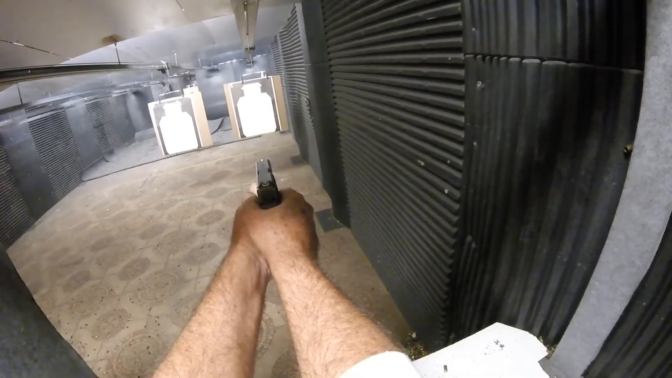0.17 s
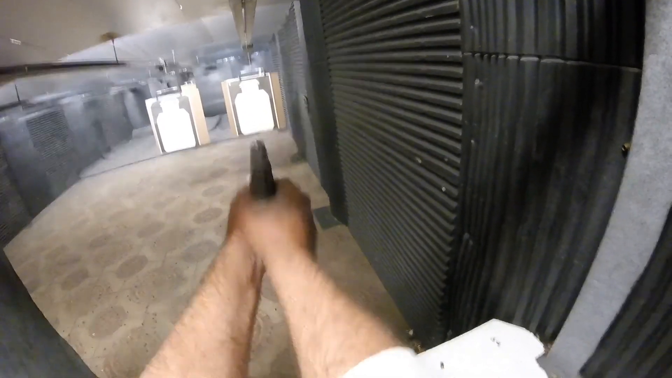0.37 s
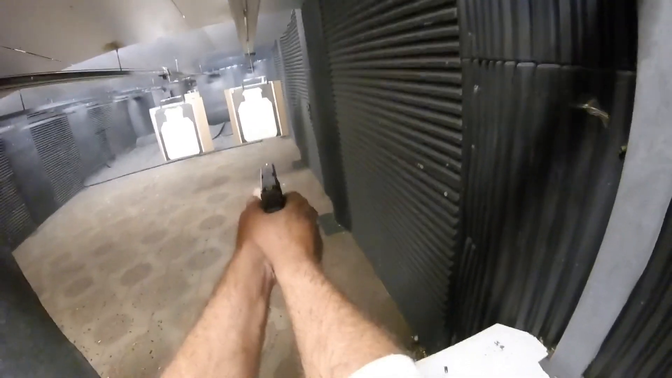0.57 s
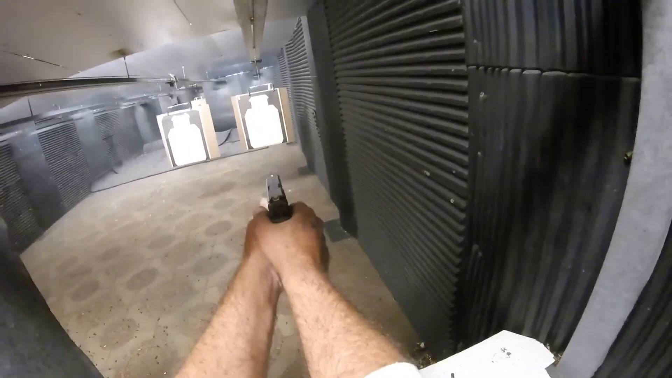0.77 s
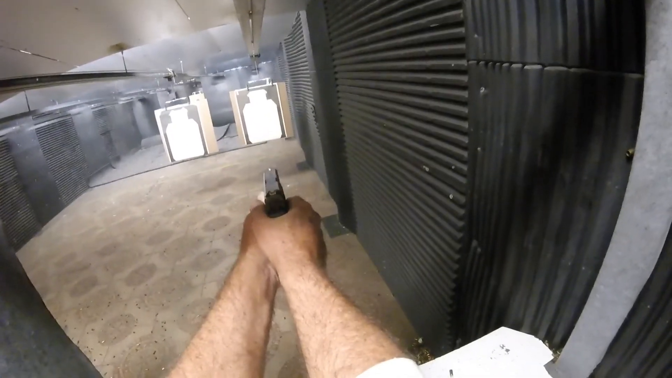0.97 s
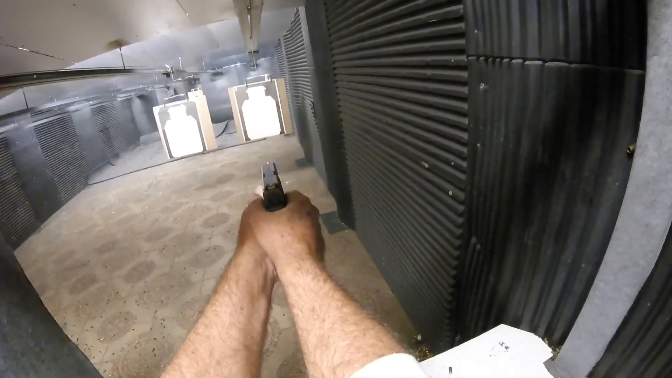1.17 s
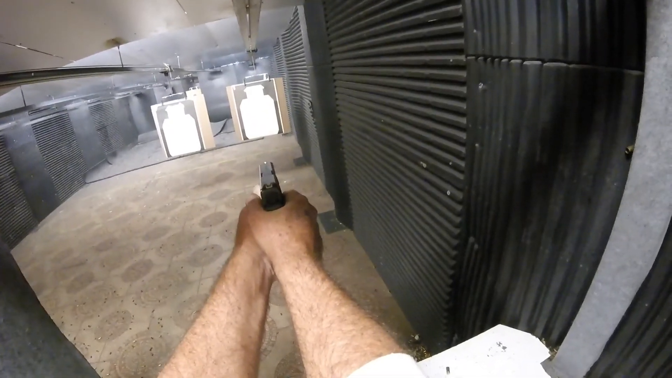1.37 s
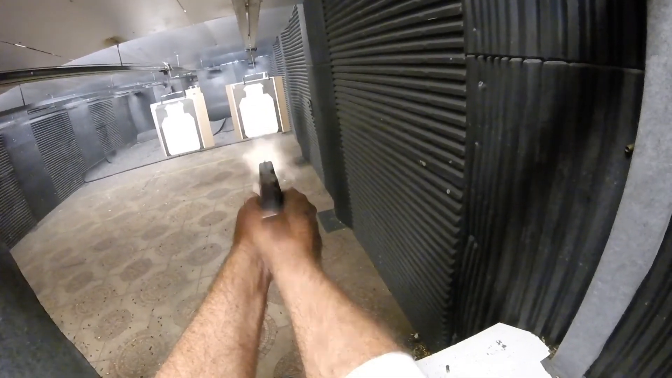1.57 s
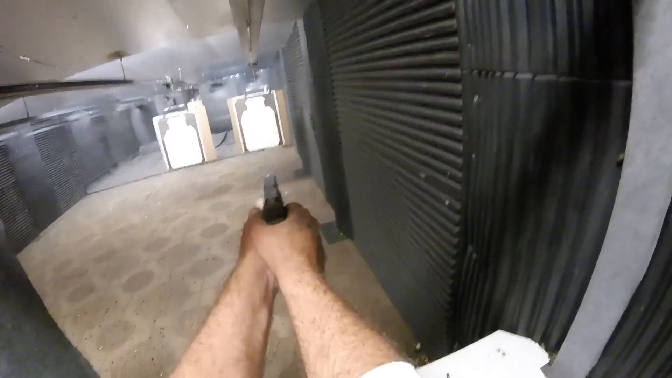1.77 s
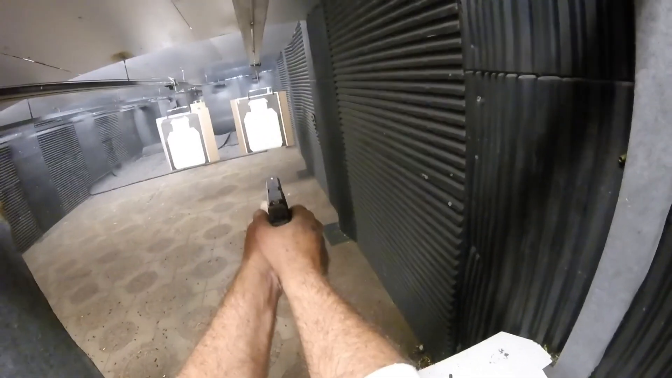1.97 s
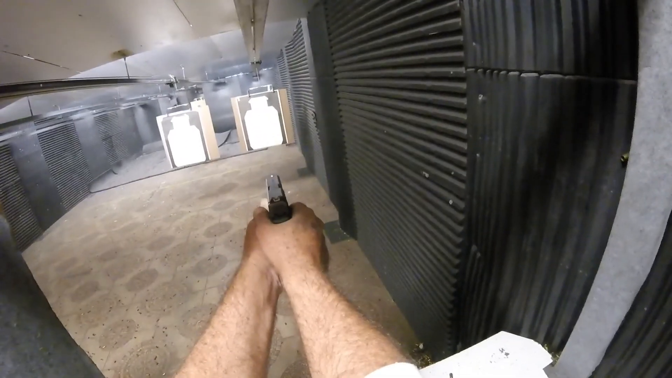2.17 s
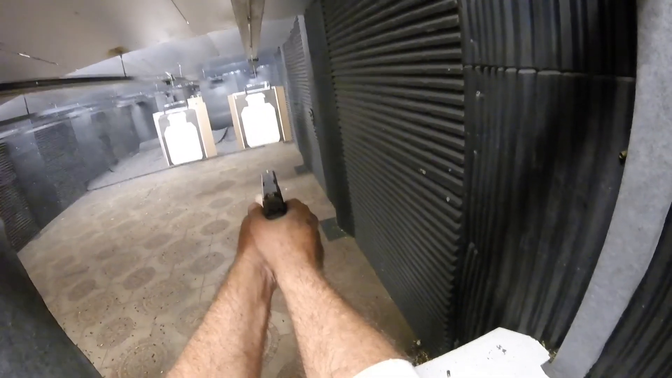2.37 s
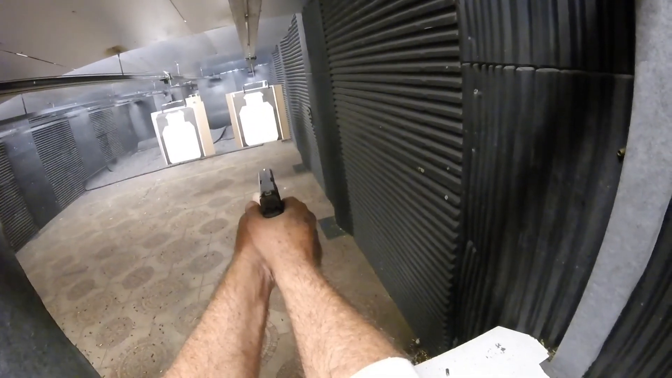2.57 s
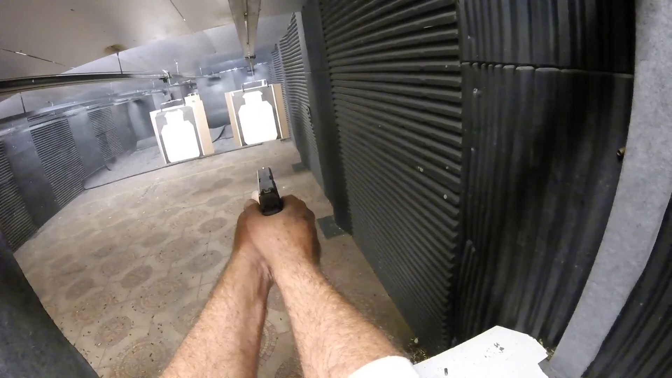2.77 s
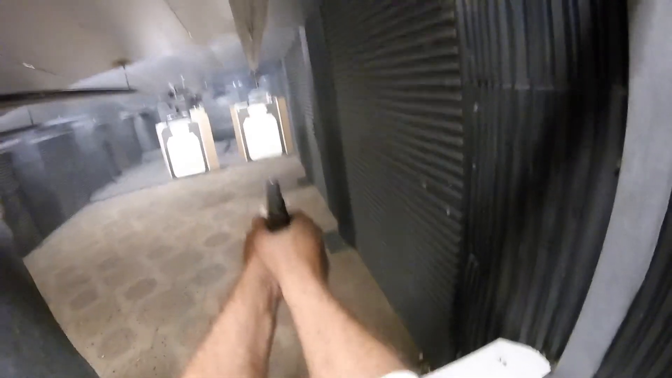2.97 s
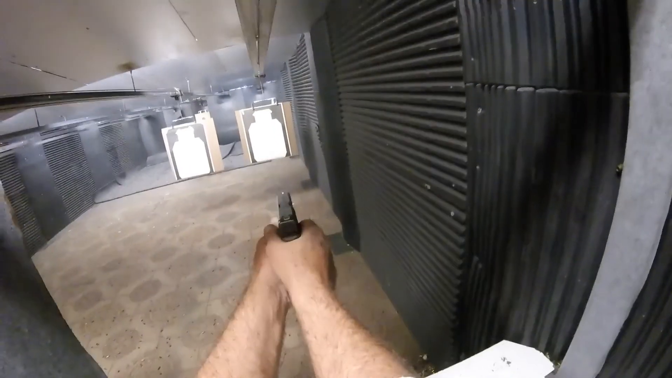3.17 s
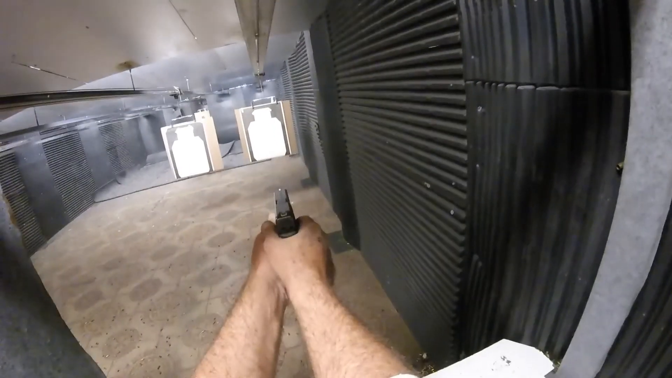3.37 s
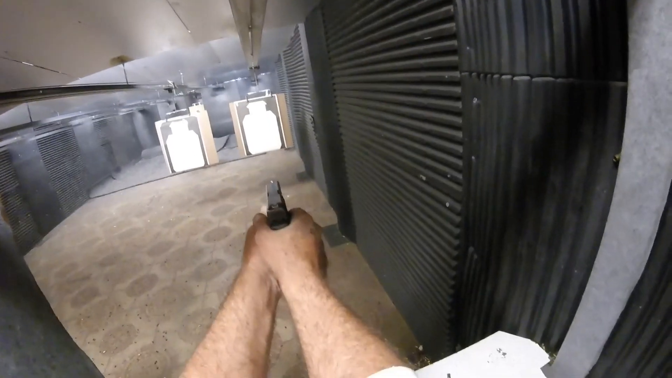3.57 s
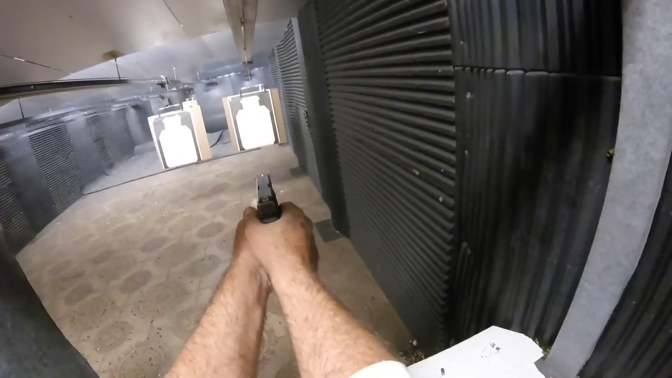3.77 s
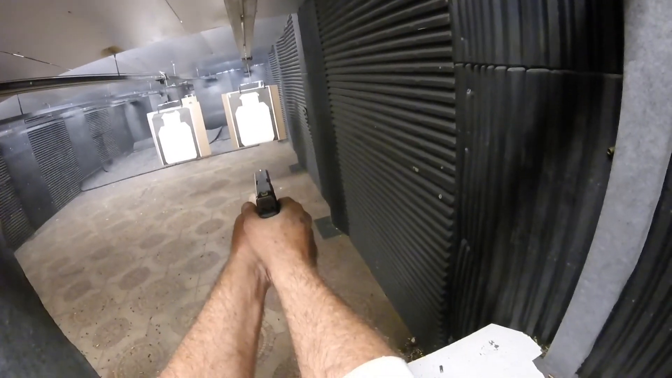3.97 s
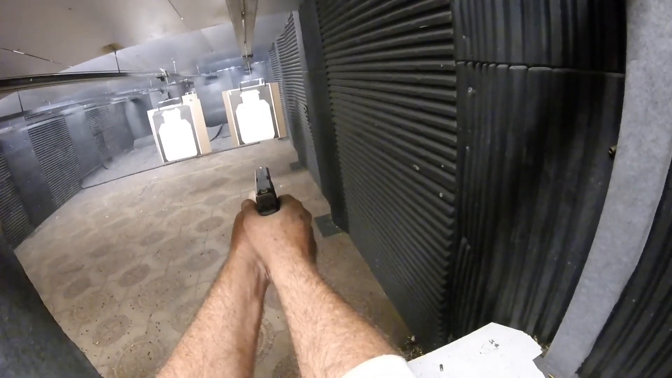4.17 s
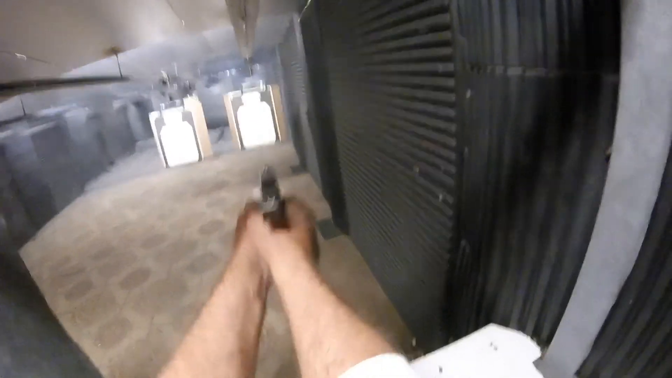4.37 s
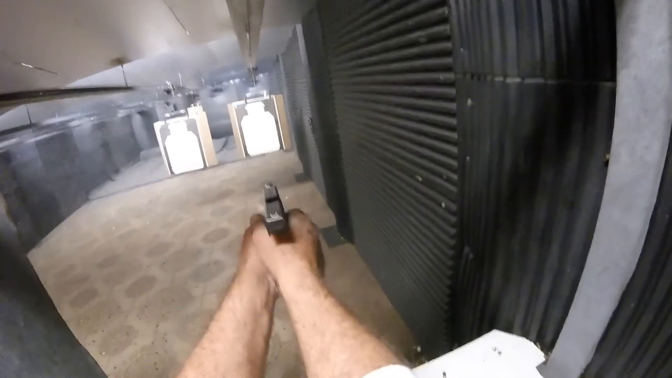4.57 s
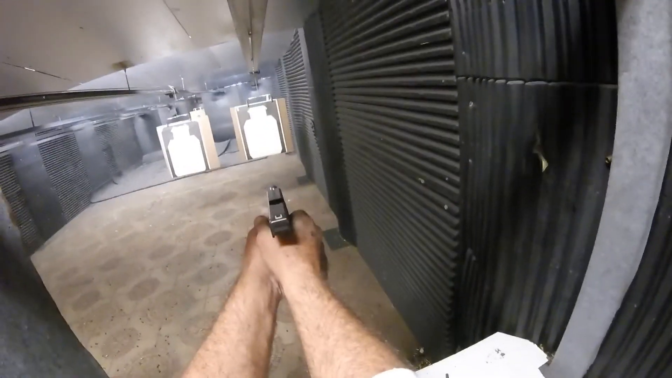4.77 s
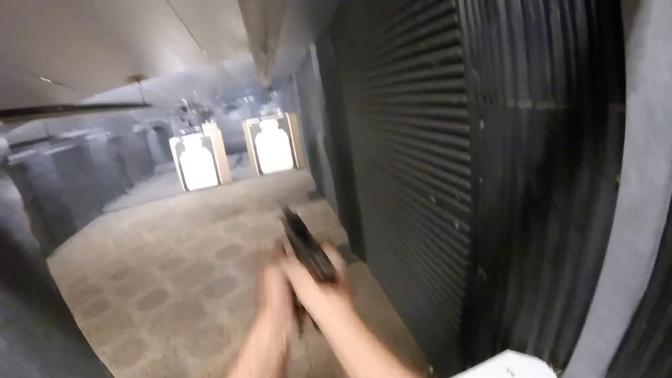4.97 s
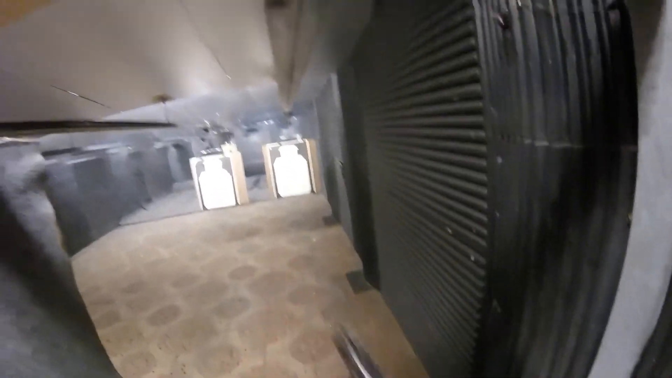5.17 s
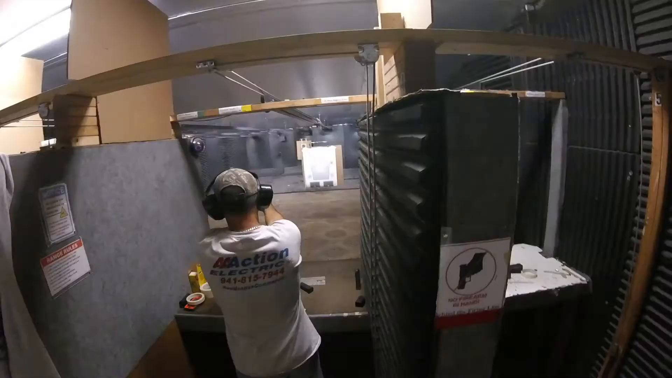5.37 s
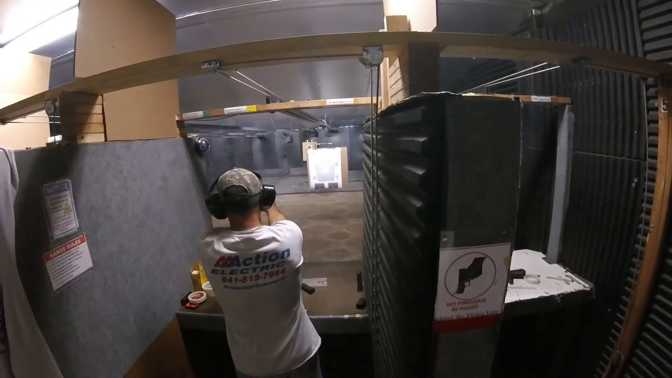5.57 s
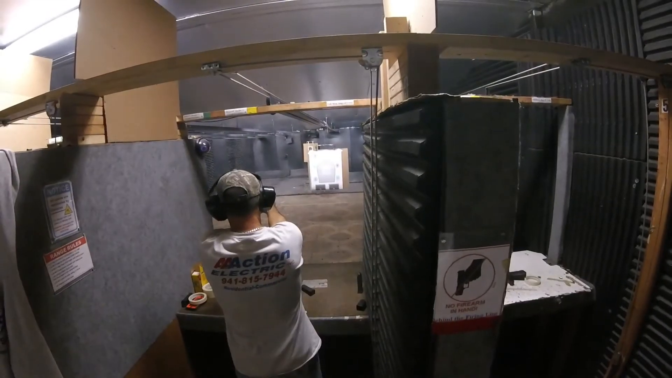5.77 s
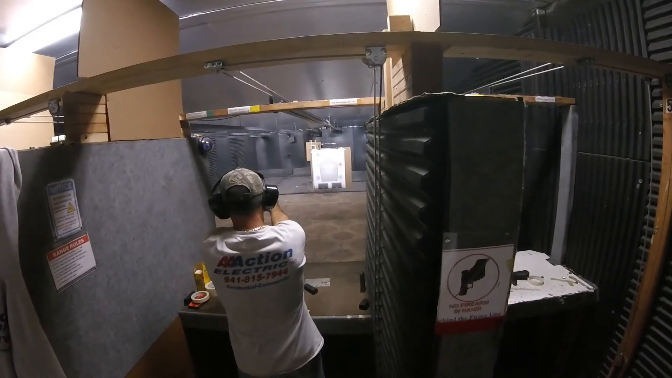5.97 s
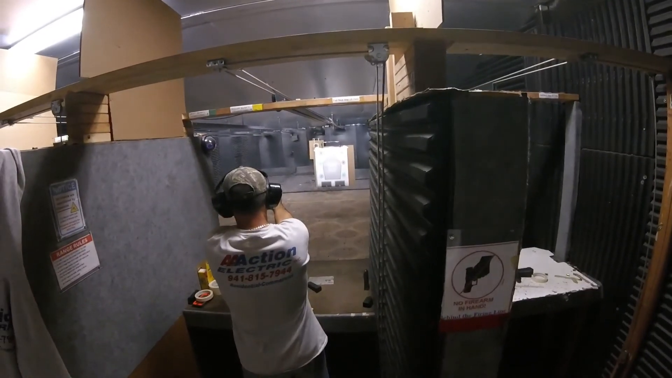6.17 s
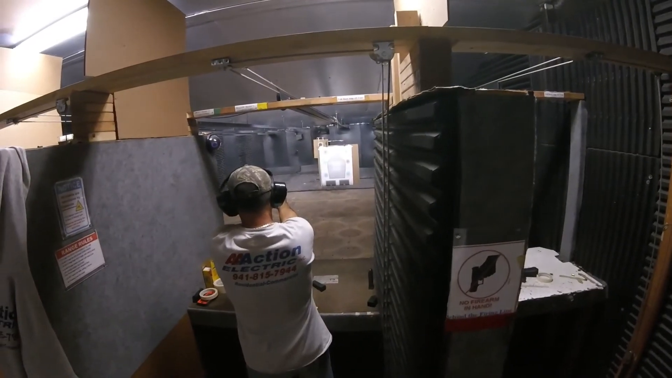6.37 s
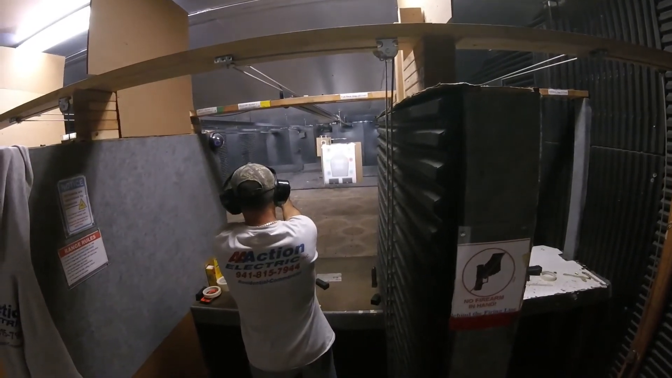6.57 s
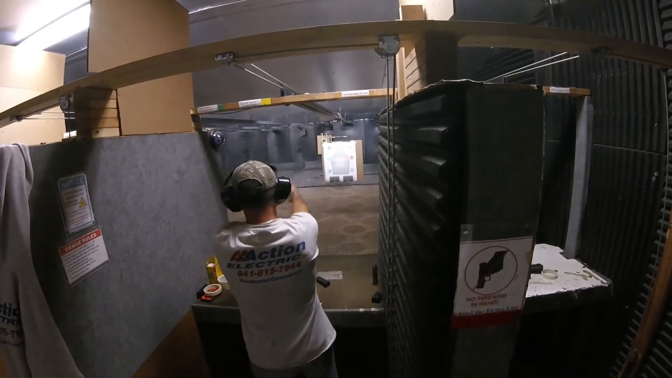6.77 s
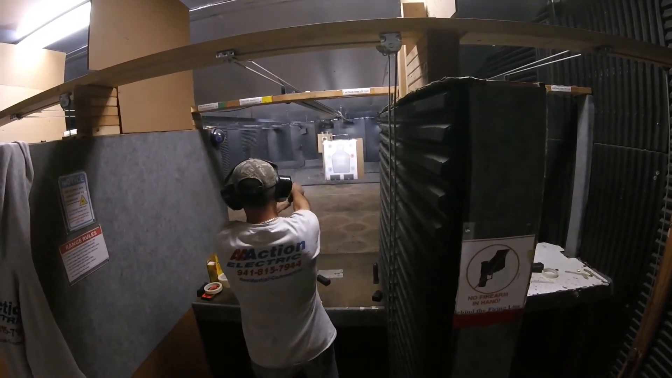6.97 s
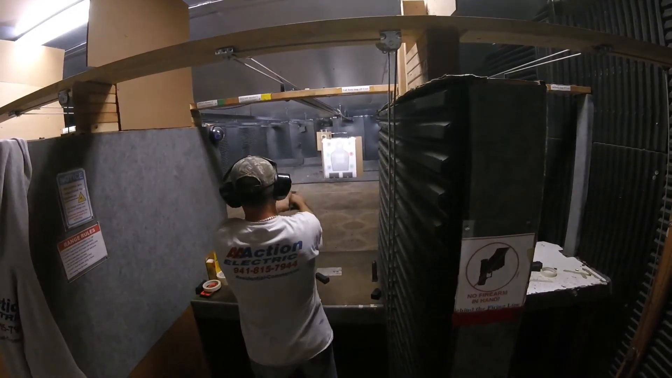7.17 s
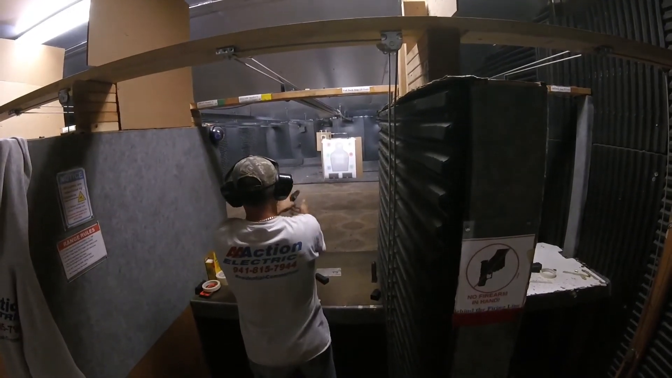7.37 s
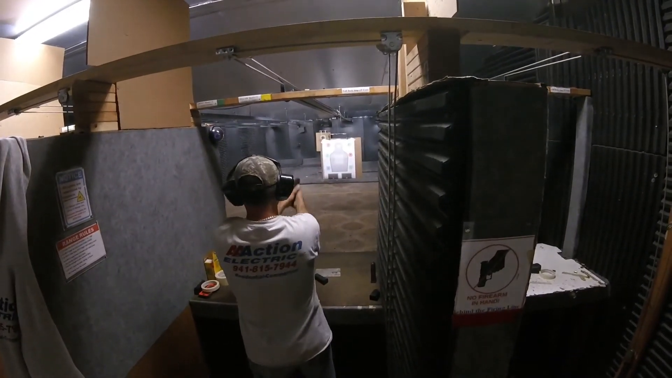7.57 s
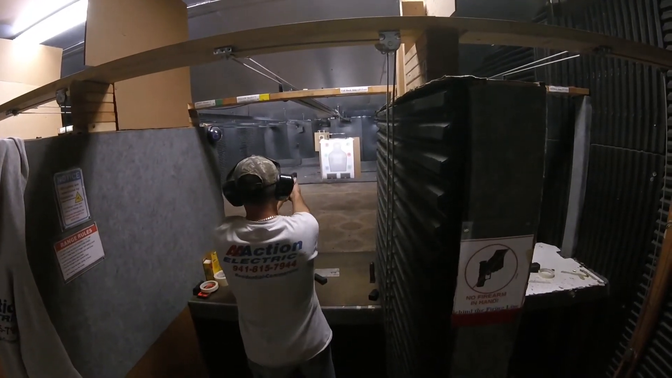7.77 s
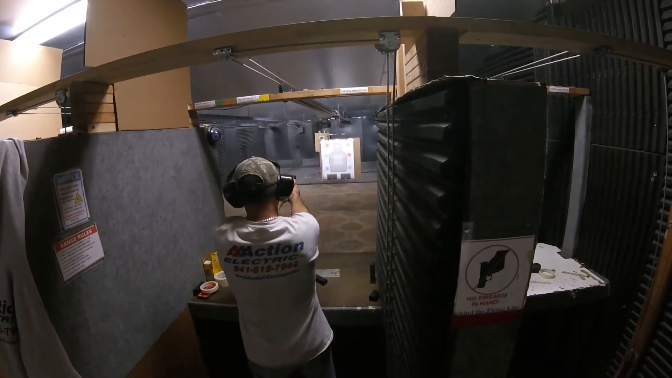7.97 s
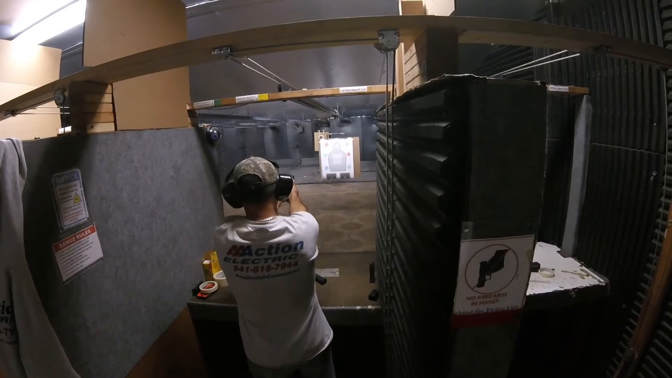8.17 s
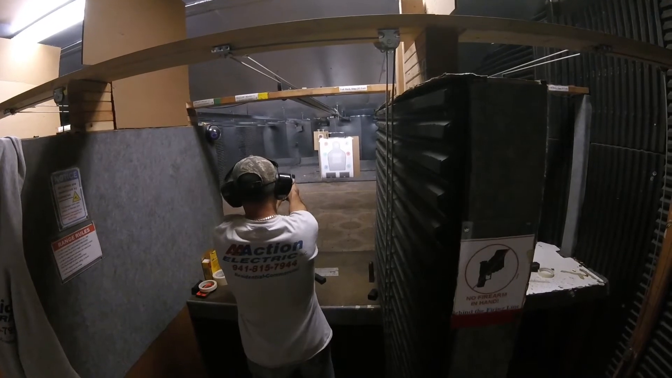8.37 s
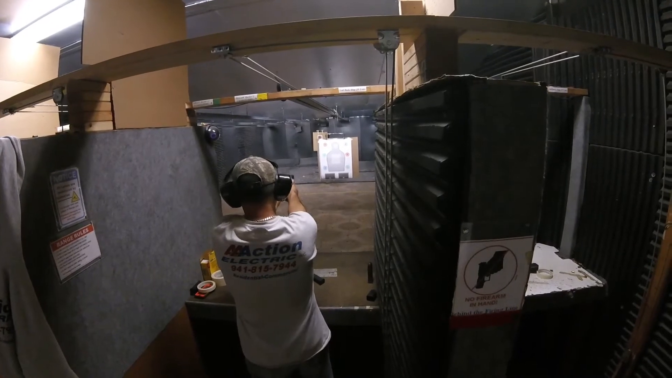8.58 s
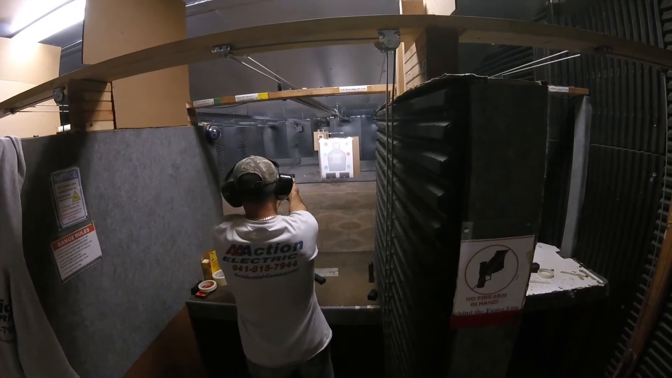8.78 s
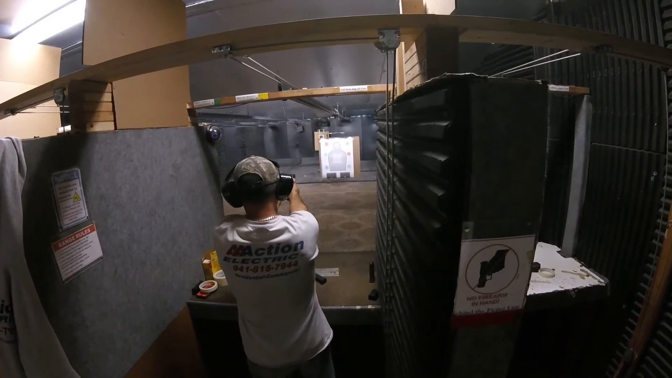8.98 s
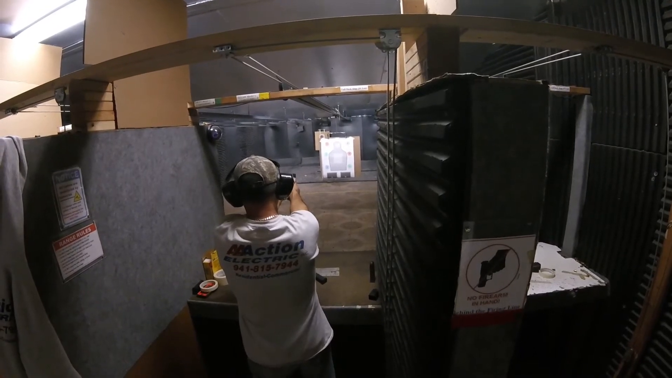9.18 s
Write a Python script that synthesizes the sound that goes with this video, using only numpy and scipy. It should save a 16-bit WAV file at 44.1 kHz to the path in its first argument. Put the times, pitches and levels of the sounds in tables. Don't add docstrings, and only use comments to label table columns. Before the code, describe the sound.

Four deafening pistol shots at an even pace ring down an indoor range, cases ticking on concrete; then quieter fan hum and a handgun's metallic magazine and slide clacks.

```python
import sys
import numpy as np
from scipy import signal
from scipy.fft import rfft, irfft
from scipy.io import wavfile
from scipy.ndimage import uniform_filter1d

SR = 44100
rng = np.random.default_rng(int(sys.argv[2]) if len(sys.argv) > 2 else 0)


def decibels_to_gain(level_db):
    exponent = np.asarray(level_db, float) / 20
    return 10 ** exponent


def master(y):
    cut = np.clip(np.atleast_2d(y).T, -1, 1)
    pcm = np.round(cut * 32767)
    wavfile.write(sys.argv[1], SR, pcm.astype(np.int16))


N = 406161

# start in seconds, level in dB, booth wall echo in dB,
# length of the drop-out before the blast in seconds.
BLASTS = [
    (-.96, 0., -8, .04),
    (.4054, 0., -9, .052),
    (1.6438, 0., -5, .042),
    (2.8916, 0., -15, .04),
    (4.3296, 0., -7, .036),
]
# frequency in Hz, level in dB per Hz.
CRACK_SPECTRUM = [(30, -14), (90, -5), (170, -8), (320, -2), (450, -5), (800, -.5), (1500, -9), (2600, -8),
                  (5900, -12), (7000, -22), (10000, -32), (13000, -56), (14500, -95)]
# frequency in Hz, level in dB per Hz.
ROAR_SPECTRUM = [(25, -28), (50, -18), (110, -14), (170, -19), (300, -7.5), (600, -5), (900, -7.5),
                 (1500, -9.5), (1900, -13.5), (3200, -16.5), (5900, -22), (6700, -33), (10900, -44.5),
                 (12300, -72)]
# frequency in Hz, t60 in seconds.
HALL_DECAY = [(50, .5), (150, .56), (300, 1.08), (800, 1.15), (2000, 1.06), (4500, .95), (7500, .75),
              (12000, .52)]
# frequency in Hz, level in dB per Hz.
BOOM_SPECTRUM = [(100, -36), (190, -14), (290, -3), (550, -1), (800, -2), (1150, -6), (2000, -35),
                 (16000, -90)]
# frequency in Hz, width in Hz, level in dB.
LANE_WAVES = [(191, 24, -6), (279, 16, -5), (338, 16, -3), (377, 20, -2), (495, 18, -1), (533, 18, -2),
              (619, 18, -3), (672, 18, -2), (798, 22, -5), (967, 20, -3), (1159, 26, -7)]
# frequency in Hz, level in dB per Hz.
NEAR_AIR_SPECTRUM = [(15, -20), (30, -2), (60, .1), (120, -5), (180, -19), (350, -18), (1200, -29),
                     (2500, -41), (6000, -52), (9000, -61), (14000, -80)]
# start in seconds, tick level in dB, tick frequency in Hz,
# smear level in dB, brass ring level in dB.
CASE_BOUNCES = [(.088, -54, 5200, -9, -95), (.19, -51, 5600, -9, -73), (.8834, -47, 8000, -35, -110),
                (.897, -52, 9000, -35, -110), (.9824, -46, 6000, -30, -110), (1.0445, -32, 3500, -16, -110),
                (2.0444, -45, 6000, -25, -110), (2.3146, -32, 4500, -20, -82),
                (2.7082, -42, 4500, -16, -78), (3.5862, -34, 4800, -26, -84), (3.897, -50, 5400, -10, -71),
                (4.12, -60, 3000, -18, -110), (5.0444, -29, 5400, -16, -95), (5.2344, -43, 4500, -18, -110)]
# frequency in Hz, level in dB, t60 in seconds.
BRASS_MODES = [(5300, -3, .2), (11420, -2, .3), (11540, -1, .45)]
# frequency in Hz, level in dB.
PORT_RESPONSE = [(300, -20), (1500, -4), (2500, .1), (6000, .1), (6800, -11), (11000, -18), (13000, -45),
                 (16000, -85)]
# frequency in Hz, level in dB per Hz.
FAR_AIR_SPECTRUM = [(12, -25), (25, -1), (45, -4), (90, -9), (150, -12), (190, -23), (300, -29),
                    (500, -31.5), (1000, -38), (2000, -44.5), (4200, -56.5), (7000, -54.5), (10000, -63),
                    (14000, -77)]
# frequency in Hz, width in Hz, level in dB.
FAN_TONES = [(32, 7, -7), (135, 5, -9), (511, 3, -30), (630, 4, -35), (964, 6, -39)]
# frequency in Hz, level in dB.
MOTOR_HUM = [(239.8, -13.5), (479.6, -31)]
# start in seconds, level in dB, clatter t60 in seconds,
# brightness in dB per octave, slide ring level in dB.
STEEL_CLACKS = [
    (6.445, -50, .05, -1.5, -40),
    (6.4702, -16.5, .085, -.2, -40),
    (7.1738, -10, .04, .8, -28),
    (7.277, -28, .03, .5, -8),
    (7.2952, -11.5, .075, 2.2, -16),
]
# frequency in Hz, level in dB per Hz.
STEEL_SPECTRUM = [(150, -50), (300, -31), (950, -23), (1200, -10), (1800, -9), (2700, -4), (4200, -6),
                  (6000, -7), (6700, -20), (10000, -28), (12000, -42), (14500, -85)]
# frequency in Hz, width in Hz, level in dB.
SLIDE_MODES = [(1362, 140, -4), (2003, 90, -1), (3050, 120, -6), (3965, 90, -2), (4075, 130, -1),
               (9851, 200, -5)]
# start in seconds, length in seconds, level in dB.
SLIDE_STROKES = [
    (7.103, .068, -29),
    (7.172, .065, -29),
    (7.235, .06, -39),
]
# frequency in Hz, width in Hz, level in dB.
MAGAZINE_MODES = [(1920, 120, -9), (2940, 220, .1), (3500, 200, -4), (4500, 250, -4), (5770, 250, -8)]
# start in seconds, frequency in Hz,
# width in Hz, level in dB, t60 in seconds.
BODY_KNOCKS = [(6.471, 500, 400, -40, .08), (7.125, 900, 400, -45, .3), (7.174, 900, 320, -23, .09),
               (7.175, 300, 80, -41, .1), (7.296, 790, 120, -33, .12), (7.296, 550, 60, -37, .12),
               (7.296, 3990, 150, -38.5, 1.05), (7.174, 1780, 120, -30, .15)]

BLOOM_S = .042
CUT_S = 5.3885


def evened(x):
    return x / np.sqrt(np.mean(x ** 2) + 1e-20)


def read(points, hz):
    f, value = np.transpose(points)
    return np.interp(np.log(hz + 1), np.log(f + 1), value)


def add(mix, s, sound):
    at = round(s * SR)
    sound = sound[max(-at, 0):]
    part = mix[max(at, 0):][:len(sound)]
    part += sound[:len(part)]


def coloured(x, points, tilt_db=0.):
    hz = np.fft.rfftfreq(8192, 1 / SR)
    log_gain = np.log(decibels_to_gain(read(points, hz) + tilt_db * np.log2(hz / 3000 + 1e-3)))
    both_sides = np.r_[log_gain, log_gain[-2:0:-1]]
    response = np.exp(np.conj(signal.hilbert(both_sides))[:len(hz)])
    taps = irfft(response)[:4096]
    return signal.oaconvolve(x, taps / np.linalg.norm(taps))[:len(x)]


def resonate(x, hz, width):
    r = np.exp(-np.pi * width / SR)
    return evened(signal.lfilter([1], [1, -2 * r * np.cos(2 * np.pi * hz / SR), r * r], x))


def dying(noise, stretch=1.):
    hz = np.fft.rfftfreq(len(noise), 1 / SR)
    t = np.arange(len(noise)) / SR
    spectrum = rfft(noise)
    out = np.zeros(len(noise))
    for k, (_, t60) in enumerate(HALL_DECAY):
        share = read([(f, float(k == j)) for j, (f, _) in enumerate(HALL_DECAY)], hz)
        out += irfft(spectrum * share, len(t)) * decibels_to_gain(-60 * t / (stretch * t60))
    return out


def rings(modes, t):
    return sum(decibels_to_gain(db - 60 * t / t60) * np.sin(2 * np.pi * (hz * t + rng.random())) for hz, db, t60 in modes)


def swell(rate_hz):
    t = np.arange(0, N + 64, 64) / SR
    rates = np.geomspace(.4, rate_hz, num=12)
    slow = sum(np.sin(2 * np.pi * (f * t + rng.random())) / np.sqrt(f) for f in rates)
    return np.interp(np.arange(N) / SR, t, evened(slow))


def air(points):
    hz = np.fft.rfftfreq(N, 1 / SR)
    return evened(irfft(rfft(rng.standard_normal(N)) * decibels_to_gain(read(points, hz)), N))


def shots():
    out = np.zeros(N)
    t = np.arange(2 * SR) / SR
    u = t[:SR // 2]
    paths = rng.standard_normal(len(t))
    bloom = 1 - np.exp(-(u / BLOOM_S) ** 2)
    fill = 1 - np.exp(-t / .028)
    for s, db, echo_db, _ in BLASTS:
        rattle = rng.standard_normal(len(u)) * np.minimum(u / .0003, 1)
        crack = decibels_to_gain(20.5) * coloured(rattle * decibels_to_gain(-60 * u / .068), CRACK_SPECTRUM)
        snap = decibels_to_gain(15) * coloured(rattle * decibels_to_gain(-60 * u / .026), CRACK_SPECTRUM, tilt_db=1.1)
        bench = -decibels_to_gain(23) * np.exp(-((u - .0068) / .00045) ** 2)
        wall_echo = decibels_to_gain(db + echo_db - 60 * u / .03) * (crack + snap)
        add(out, s + .0215, wall_echo)
        push = np.cos(2 * np.pi * 43 * u) * np.exp(-u / .022) * (1 - np.exp(-u / .0006))
        noise = .75 * paths + .65 * rng.standard_normal(len(t))
        boom = coloured(decibels_to_gain(20.5 - 60 * u / .3) * bloom * noise[-len(u):], BOOM_SPECTRUM)
        add(out, s, decibels_to_gain(db) * (crack + snap + bench + decibels_to_gain(10) * push + boom))
        add(out, s, decibels_to_gain(db + 12.8) * coloured(dying(noise) * fill, ROAR_SPECTRUM))
    return out


def lanes():
    out = np.zeros(N)
    t = np.arange(SR) / SR
    n = rng.standard_normal(len(t))
    waves = sum(decibels_to_gain(db) * resonate(resonate(n, hz, width), hz, 3 * width) for hz, width, db in LANE_WAVES)
    bloom = 1 - np.exp(-(t / BLOOM_S) ** 2)
    for s, db, *_ in BLASTS:
        add(out, s, decibels_to_gain(db + 8 - 60 * t / .42) * bloom * waves)
    return out


def near_air():
    opened = .5 + .5 * np.tanh((np.arange(N) / SR - 3.3) / .3)
    whistle_db = -63 + 3.5 * opened + 3. * swell(40)
    whistle_hz = 1450 + 24 * swell(60)
    whistle = decibels_to_gain(whistle_db) * np.sin(2 * np.pi * np.cumsum(whistle_hz) / SR)
    return decibels_to_gain(-46.5 + 1.5 * swell(8)) * air(NEAR_AIR_SPECTRUM) + whistle


def cases():
    out = np.zeros(N)
    t = np.arange(SR // 2) / SR
    for s, db, hz, smear_db, ring_db in CASE_BOUNCES:
        tick = coloured(resonate(rng.standard_normal(len(t)), hz, 3400), PORT_RESPONSE)
        shape = (np.exp(-t / .004) + decibels_to_gain(smear_db) * np.exp(-t / .1)) * (1 - np.exp(-t / .0008))
        add(out, s, decibels_to_gain(db) * evened(tick) * shape)
        add(out, s, decibels_to_gain(ring_db) * rings(BRASS_MODES, t) * (1 - np.exp(-t / .004)))
    return out


def body_camera():
    rest_db, dive_db, recover_s, recover_shape = 2.2, -32, .66, 2.6
    t = np.arange(N) / SR
    gain_db, live = np.zeros(N), np.ones(N)
    for s, *_, gap_s in BLASTS:
        after, before = t >= s, t < s
        gain_db[after] = rest_db + dive_db * np.exp(-((t[after] - s) / recover_s) ** recover_shape)
        live[before] *= np.clip(1 - (t[before] - s + gap_s) / .003, 0, 1)
    blasts = (shots() + lanes()) * decibels_to_gain(gain_db)
    heard = blasts + near_air() * decibels_to_gain(.62 * gain_db) + cases()
    limited = .66 * np.tanh(heard / .66)
    held = signal.lfilter([1 - .993], [1, -.993], limited * live)
    return live * limited + (1 - live) * (held + decibels_to_gain(-80) * air(NEAR_AIR_SPECTRUM))


def far_air():
    t = np.arange(N) / SR
    tones = sum(decibels_to_gain(db) * resonate(rng.standard_normal(N), hz, width) for hz, width, db in FAN_TONES)
    hum = sum(decibels_to_gain(db) * np.sin(2 * np.pi * hz * t + .4 * swell(3)) for hz, db in MOTOR_HUM)
    since = np.maximum(t - 7.17, 0)
    duck_db = -6 * (1 - np.exp(-since / .1)) * np.exp(-since / 2.2)
    return decibels_to_gain(-37.5 + duck_db + .7 * swell(6)) * (decibels_to_gain(.5) * air(FAR_AIR_SPECTRUM) + tones + hum)


def slide_tinted(noise, ring_db):
    return noise + decibels_to_gain(ring_db) * sum(decibels_to_gain(db) * resonate(noise, hz, width) for hz, width, db in SLIDE_MODES)


def handling():
    out = np.zeros(N)
    t = np.arange(SR) / SR
    for s, db, t60, tilt_db, ring_db in STEEL_CLACKS:
        hall_db = -12.5 + 7.5 * np.log2(t60 / .08)
        steel, echo = (slide_tinted(n, ring_db) for n in rng.standard_normal((2, len(t))))
        clatter = steel * decibels_to_gain(-60 * t / t60) * np.minimum(t / .002, 1)
        hall = decibels_to_gain(hall_db) * dying(echo, stretch=.93) * (1 - np.exp(-t / .01))
        add(out, s, decibels_to_gain(db) * coloured(clatter + hall, STEEL_SPECTRUM, tilt_db=tilt_db))
    u = t[:SR // 5]
    for s, length, db in SLIDE_STROKES:
        hiss, chance = rng.standard_normal((2, len(u)))
        grains = hiss * decibels_to_gain(1.8 * evened(uniform_filter1d(chance, size=90)))
        rise, sag = np.minimum(u / .027, 1) ** 2, decibels_to_gain(-7 * u / length)
        push = rise * sag * np.clip((length - u) / .008 + 1, 0, 1)
        add(out, s, decibels_to_gain(db) * push * coloured(evened(grains), STEEL_SPECTRUM, tilt_db=-.6))
    return out


def magazine():
    out = np.zeros(N)
    t = np.arange(SR // 4) / SR
    n = rng.standard_normal(len(t))
    modes = (decibels_to_gain(db) * resonate(resonate(n, hz, width), hz, 3 * width) for hz, width, db in MAGAZINE_MODES)
    body = evened(sum(modes))
    add(out, 6.4705, decibels_to_gain(-23 - 60 * t / .2) * np.minimum(t / .001, 1) * body)
    return out


def knocks():
    out = np.zeros(N)
    t = np.arange(SR) / SR
    for s, hz, width, db, t60 in BODY_KNOCKS:
        body = resonate(resonate(rng.standard_normal(len(t)), hz, width), hz, width)
        add(out, s, decibels_to_gain(db - 60 * t / t60) * body * (1 - np.exp(-t / .002)))
    return out


def scene():
    t = np.arange(N) / SR
    rear = (far_air() + handling() + magazine() + knocks()) * np.clip((t - CUT_S) / .02, 0, 1)
    return np.where(t < CUT_S, body_camera(), rear)[None]


def starved(x):
    lowest_hz, floor_db, chance_db = 6600, -48, 9.
    hz, _, z = signal.stft(x, SR, nperseg=2048)
    band = np.arange(len(hz)) // 8
    power = np.add.reduceat(abs(z) ** 2, np.arange(0, len(hz), 8), axis=1)
    chance = evened(uniform_filter1d(rng.standard_normal(power.shape), size=5, axis=2))
    loudest = power[:, 2:].max(axis=1, keepdims=True)
    floor = loudest * decibels_to_gain(2 * (floor_db + chance_db * chance))
    empty = (power < floor)[:, band] & (hz > lowest_hz)[:, None]
    return x - signal.istft(z * empty, SR, nperseg=2048)[1][:, :N]


def roll_off(x):
    return signal.sosfilt(signal.butter(12, 15700, fs=SR, output="sos"), x)


def record(dry):
    edge = signal.firwin(101, 14700, fs=SR)
    mix = signal.oaconvolve(starved(dry), edge[None], "same")
    return roll_off(mix)


dry = scene()
out = record(dry)
master(out)
```